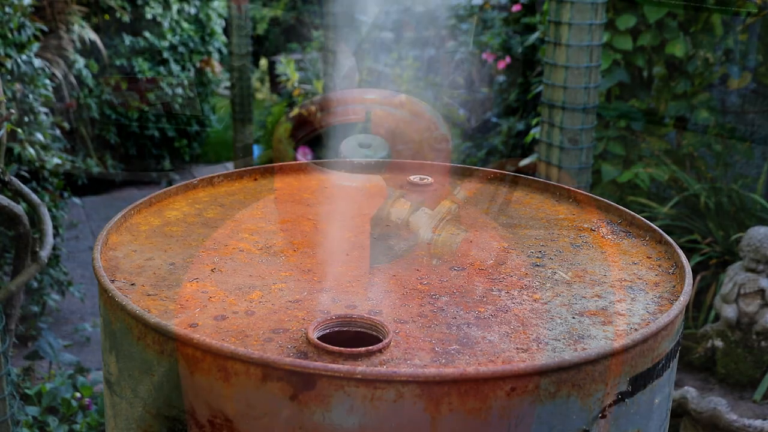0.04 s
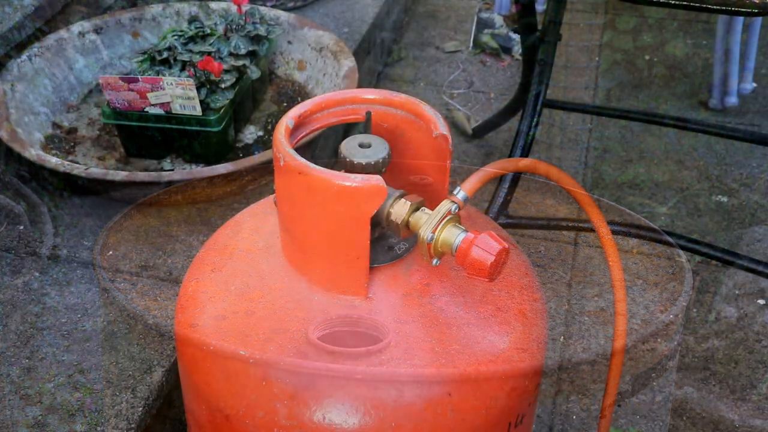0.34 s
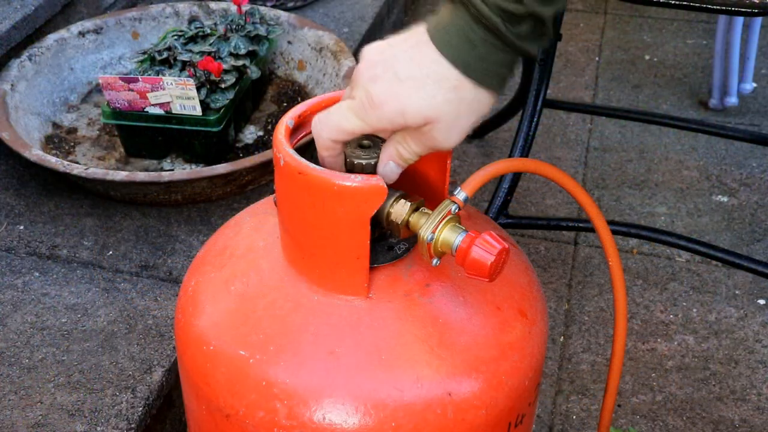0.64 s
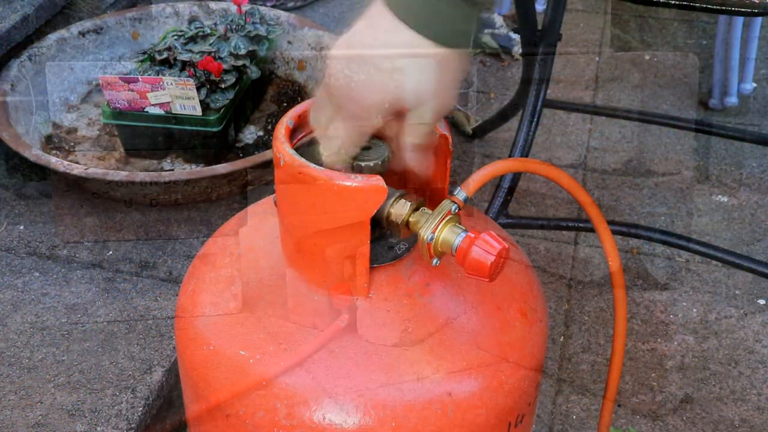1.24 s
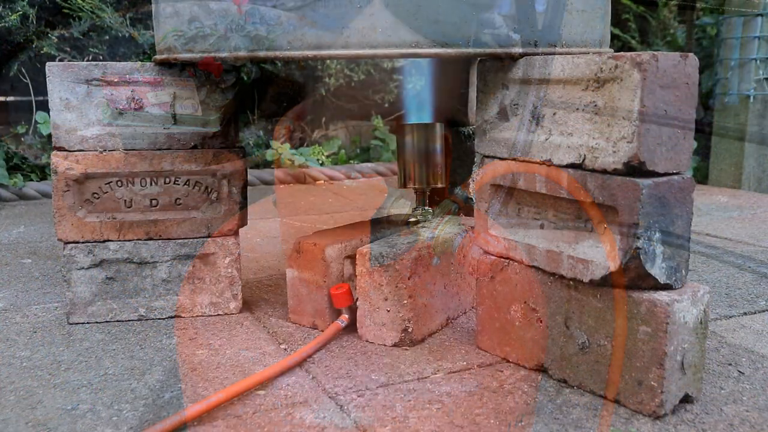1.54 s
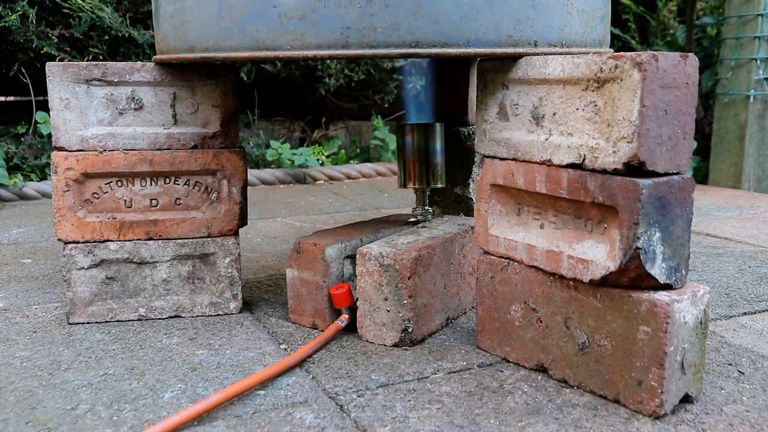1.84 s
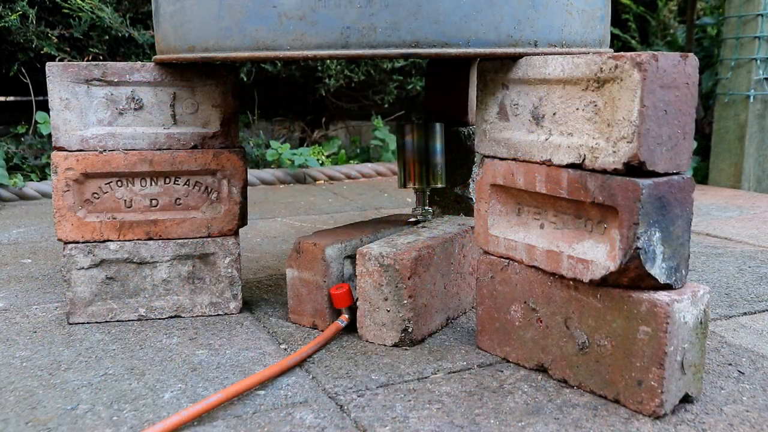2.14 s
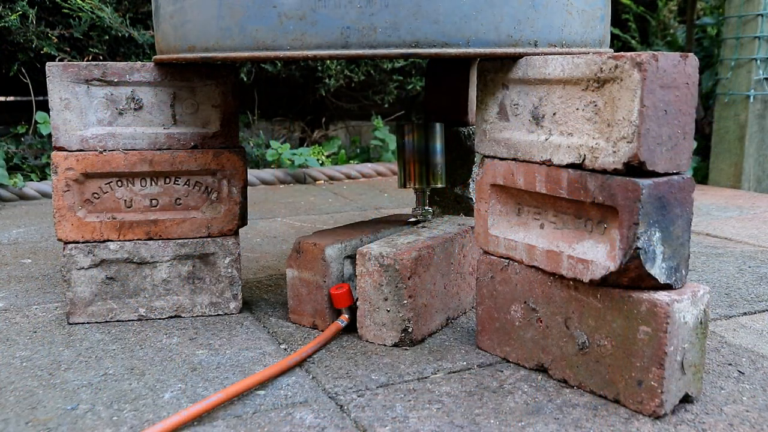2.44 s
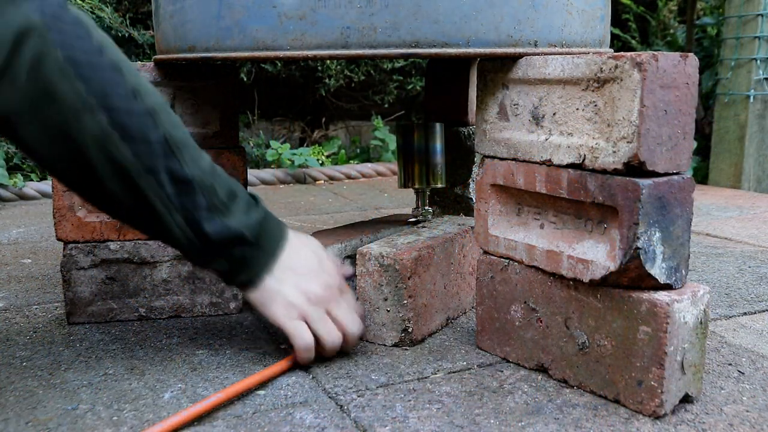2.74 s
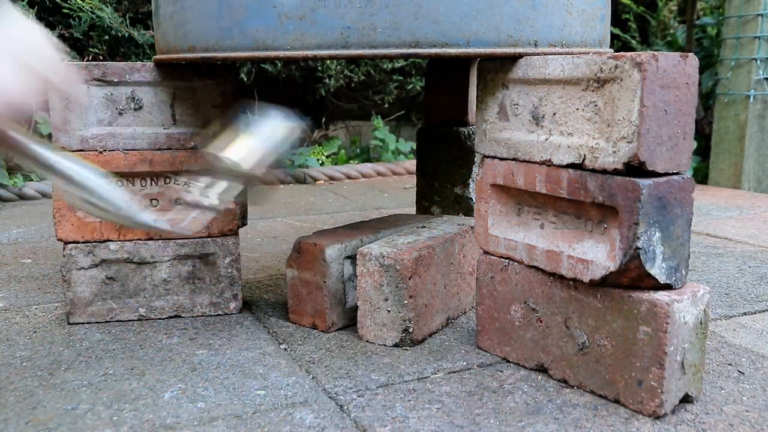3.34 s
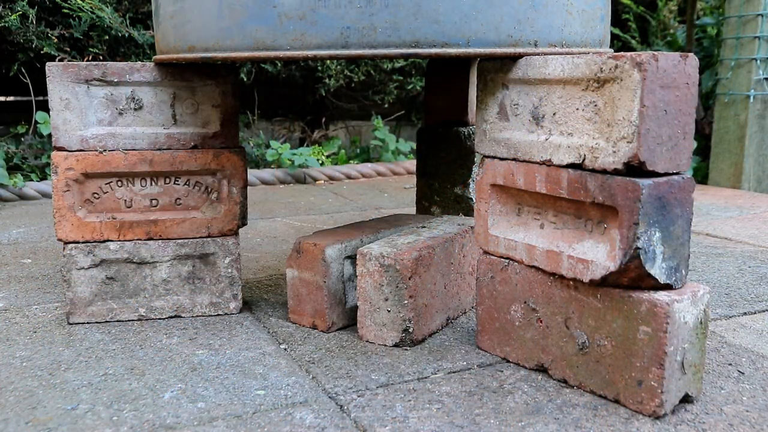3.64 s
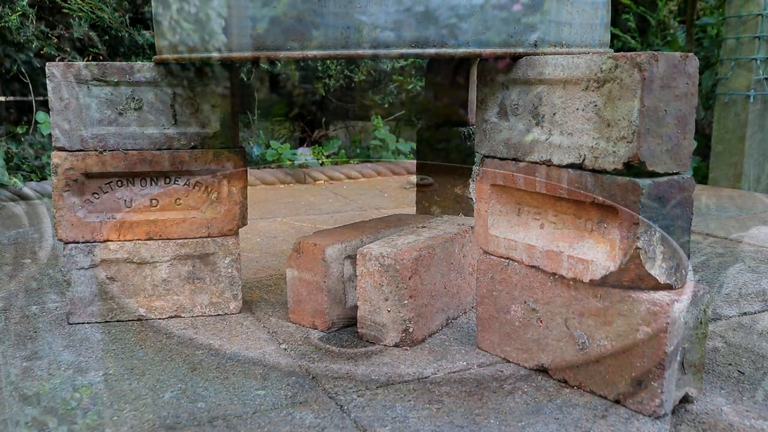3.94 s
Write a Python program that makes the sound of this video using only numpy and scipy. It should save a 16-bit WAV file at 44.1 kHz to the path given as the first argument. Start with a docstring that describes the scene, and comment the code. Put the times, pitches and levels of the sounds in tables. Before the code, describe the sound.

A gas burner roars steadily under a steel drum, dipping slightly around 1 second, then sounding closer and hissier from 1.5. At about 2 seconds it shuts off quickly, hiss first. Quiet garden air remains, with faint scuffs and hose rubbing from 2.3. At 3.2 the steel torch scrapes lightly off a brick and rings briefly. A distant bird calls very faintly near 2.8 and 3.4.

```python
"""A gas torch roars under a steel drum: turbulent flame and hissing jet, coloured by the drum's
resonances, heard at the vent, then by the gas bottle, then beside the flame. The valve is shut:
the hiss dies first, then the roar. In the quiet garden the hose is picked up, and the torch
scrapes off its brick and rings as it is carried away. A distant bird calls twice."""
import sys
import numpy as np
from scipy import signal
from scipy.fft import rfft, irfft, next_fast_len
from scipy.io import wavfile
from scipy.ndimage import map_coordinates

SR = 44100
rng = np.random.default_rng(int(sys.argv[2]) if len(sys.argv) > 2 else 0)


def store_pcm(level_fs):
    """Save levels as 16-bit WAV."""
    pcm = np.round(np.clip(level_fs, -1, 1) * 32767).astype(np.int16)
    wavfile.write(sys.argv[1], SR, np.atleast_2d(pcm).T)


N = 176400

TO_BOTTLE_S, TO_NEAR_S = (0.4, 0.875), (1.22, 1.706)  # listener's moves: start, end
ECHO_FAR_DB, ECHO_NEAR_DB = -2.5, -9

# flame envelope: t/s, level/dB
FLAME_ENVELOPE = [(0.0, -14), (0.284, -13.5), (0.794, -18), (0.806, -19.5), (1.3, -19), (1.332, -16.5),
                  (1.364, -19), (1.418, -16), (1.606, -16.5), (1.73, -14), (1.93, -15)]
# flame spectra at vent, bottle and flame: f/Hz, relative density/dB
ROAR_VENT = [(15, -54), (25, -30), (54, -27.5), (80, -7.5), (119, -14), (162, -2.5), (212, -4.5), (250, 1),
             (328, -11), (407, -8.5), (471, -6.5), (544, -6.5), (652, -2.5), (826, -8.5), (872, -11),
             (954, -17), (1030, -6.5), (1210, -12.5), (1400, -9.5), (1590, -21), (1740, -27.5), (1900, -29),
             (2470, -56.5), (4180, -120)]
ROAR_BOTTLE = [(15, -67), (25, -38), (60, -24), (84, -11.5), (130, -1), (187, -6.5), (220, -1.5), (245, -2),
               (316, 0), (415, -8.5), (525, -9.5), (641, -3), (701, -12), (796, -17.5), (888, -9.5),
               (972, -16), (1060, -9), (1250, -8), (1420, -9), (1530, -14.5), (1900, -25.5), (2470, -54.5),
               (4180, -120)]
ROAR_NEAR = [(15, -58), (25, -28.5), (81, -12.5), (130, -0.5), (201, -3.5), (232, 4), (259, -4),
             (316, -0.5), (352, -7), (393, -3), (506, -6), (618, -10), (689, -16), (872, -17.5), (1030, -8),
             (1280, -9), (1420, -10.5), (1560, -18), (1900, -30.5), (2470, -53.5), (4180, -120)]
def flame():
    """Turbulent combustion roars in the drum, heard from three places in turn."""
    vent = in_drum(ROAR_VENT, ECHO_FAR_DB, resonance=1.7)
    bottle = in_drum(ROAR_BOTTLE, ECHO_FAR_DB, resonance=0.77)
    near = in_drum(ROAR_NEAR, ECHO_NEAR_DB, resonance=0.69)
    far = move(vent, bottle, TO_BOTTLE_S)
    return unit(move(far, near, TO_NEAR_S)) * amp(curve(FLAME_ENVELOPE))


# jet envelope: t/s, level/dB
JET_ENVELOPE = [(0.0, -32), (0.368, -32), (0.844, -35), (1.144, -34.5), (1.62, -27.5), (1.92, -27)]
# jet spectra, far and near: f/Hz, relative density/dB
HISS_FAR = [(1000, -26.5), (1700, -7.5), (2050, -6.5), (2380, -3.5), (2920, -10.5), (3450, -3), (3960, -7),
            (4910, -4.5), (6310, -18.5), (7390, -20.5), (8260, -20), (10700, -24.5), (12600, -23.5),
            (14400, -26.5), (15700, -43)]
HISS_NEAR = [(1000, -32), (1700, 0), (3030, -5), (3640, -4.5), (4080, -9.5), (5000, -4), (5640, -12.5),
             (6860, -17.5), (7960, -18.5), (10300, -21), (12300, -20), (14000, -21.5), (15700, -29.5)]
def gas_jet(flutter_db=0.26):
    """Escaping gas hisses with a slight flutter."""
    far = in_drum(HISS_FAR, ECHO_FAR_DB, resonance=0.7)
    near = in_drum(HISS_NEAR, ECHO_NEAR_DB, resonance=0.4)
    flutter = amp(flutter_db * (wobble(96) + wobble(500)))
    return unit(move(far, near, TO_NEAR_S) * flutter) * amp(curve(JET_ENVELOPE))


# drum and torch tube peaks and dips: f/Hz, width/Hz, gain/dB at resonance=1
DRUM_RESONANCES = [(168, 20, 2), (226.7, 9.2, 2), (658, 5.3, 6.5), (710, 18, 1), (1030, 30, -0.5),
                   (1265, 30, 3.5), (1442, 13, 5), (2070, 18, 8), (2569, 30, -3.5), (3435, 25, -6.5),
                   (3355, 22, -0.5), (4480, 24, 3), (5150, 33, 2.5)]
def in_drum(spectrum, echo_db, resonance, echo_t60_s=0.076, drift_turns=0.21):
    """Turbulence coloured by resonances and by reflections that drift with the hot gas."""
    def colour_db(f):
        return sum(db / (1 + (2 * (f - hz) / width) ** 2) for hz, width, db in DRUM_RESONANCES)

    direct = filtered(noise(spectrum), lambda f: amp(resonance * colour_db(f)))
    treble = filtered(direct, lambda f: f ** 2 / (f ** 2 + 1200 ** 2))
    angle = 2 * np.pi * drift_turns * wobble(2.87)
    reflected = np.cos(angle) * echoes(treble, echo_t60_s) + np.sin(angle) * echoes(treble, echo_t60_s)
    return unit(direct + amp(echo_db) * reflected)


# decay after the valve shuts: f/Hz, start/s, initial fall/(dB/s)
PRESSURE_FALL = [(100, 1.952, 200), (400, 1.925, 198), (616, 1.924, 188), (776, 1.886, 181),
                 (1220, 1.948, 167), (1450, 1.933, 151), (2100, 1.917, 235), (5000, 1.918, 262),
                 (12000, 1.906, 332.5)]
def run_down(x, flame_out_s=2.018, out_db_per_s=560):
    """Falling pressure takes the treble first; then the flame goes out."""
    f, t, spectra = signal.stft(x, SR, nperseg=512)
    start_s = along([(hz, s) for hz, s, _ in PRESSURE_FALL], f)[:, None]
    fall_db_per_s = along([(hz, rate) for hz, _, rate in PRESSURE_FALL], f)[:, None]
    loss_db = fall_db_per_s * np.maximum(t - start_s, 0) + out_db_per_s * np.maximum(t - flame_out_s, 0)
    return signal.istft(spectra * amp(-loss_db), SR, nperseg=512)[1][:N]


def burner(tail_db=-25):
    """Flame and jet run until shut off; the roar reverberates in the drum."""
    roar = run_down(flame())
    hiss = run_down(gas_jet())
    return roar + hiss + amp(tail_db) * echoes(roar, t60_s=0.49)


# scrape envelope: t/s, level/dB
SCRAPE_ENVELOPE = [(3.13, -84), (3.18, -62), (3.205, -47.5), (3.226, -46.5), (3.24, -46), (3.268, -51),
                   (3.29, -67), (3.32, -110)]
# hard catches of steel on brick: t/s, level/dB
CATCHES = [(3.21, -48), (3.2263, -37), (3.246, -47.5), (3.269, -49.5)]
# grit spectrum: f/Hz, relative density/dB
GRIT_SPECTRUM = [(30, -35), (90, -16), (170, 4.5), (330, 7.5), (480, -3.5), (800, 5), (1500, -6.5),
                 (2400, -5), (3600, -14), (5000, -21), (9000, -26), (15000, -26)]
# steel modes: f/Hz, relative peak/dB, t60/s
TORCH_MODES = [(2160, -53, .08), (2200, -47, 0.14), (2345, -54, .2), (2620, -60, .1), (3150, -58, .35),
               (3327, -60, 0.32), (3500, -64, .25), (3750, -55, .1), (3880, -69, 0.45), (4520, -68, 0.67),
               (5000, -68, 0.29), (5440, -67, .4), (5570, -72, .35), (6460, -64, .13), (7250, -68, .13),
               (8226, -75, 0.34), (9162, -70, .15), (9700, -71.5, .15), (10130, -76, .4),
               (11100, -69.5, .08)]
# lowest note of the torch's cup, swelling as it swings past: t/s, level/dB
CUP_ENVELOPE = [(3.22, -73), (3.29, -52), (3.36, -49.5), (3.42, -45), (3.49, -54), (3.54, -50), (3.6, -59),
                (3.75, -85)]
def torch_scrape(grain_db=5, catch_t60_s=0.0184, ring_db=-1, cup_hz=1070):
    """Brick grit scrapes the steel torch and sets its modes ringing."""
    t = clock()
    friction = gesture(SCRAPE_ENVELOPE) * unit(amp(grain_db * wobble(900)))
    force = friction + sum(amp(db) * decay(s, catch_t60_s) for s, db in CATCHES)
    out = force * noise(GRIT_SPECTRUM)
    for hz, db, t60_s in TORCH_MODES:
        mode = np.exp(-np.log(1000) * t[:SR] / t60_s) * np.sin(2 * np.pi * hz * t[:SR])
        ring = signal.fftconvolve(force * rng.standard_normal(N), mode)[:N]
        out += 2 * amp(db + ring_db) * ring / np.abs(ring).max()
    cup = np.sqrt(2) * gesture(CUP_ENVELOPE) * np.sin(2 * np.pi * cup_hz * t)
    return out + cup


# scuffs and ticks on paving: t/s, level/dB, f/Hz, relative width, t60/s
PAVING_SCUFFS = [(2.294, -56, 1900, 0.53, 0.022), (2.424, -55, 171, 0.56, 0.1),
                 (2.531, -41.5, 850, 0.91, 0.039), (2.544, -41.5, 199, 2.7, 0.05),
                 (2.65, -63, 4000, 1.1, 0.018), (2.672, -44, 503, 1.5, 0.061),
                 (2.691, -49.5, 4130, 0.937, 0.019), (2.707, -61, 5000, .9, .008),
                 (2.724, -43.5, 2070, 0.38, 0.019), (3.682, -49, 1490, 0.93, 0.039),
                 (3.956, -51, 200, 1.3, 0.091)]
# hose and sleeve drags: centre t/s, half length/s, level/dB, f/Hz, relative width
HOSE_DRAGS = [(2.47, .06, -73, 1700, 1.5), (2.567, 0.045, -64, 1590, 0.98), (2.733, 0.0647, -66, 1980, 2),
              (3.05, 0.024, -74, 2480, 1.6), (3.574, .016, -59, 2900, 0.69), (3.691, 0.023, -52, 1600, 1),
              (3.77, 0.0092, -53, 3150, 0.91), (3.97, .06, -81, 8000, 0.9)]
def handling(grain_db=4):
    """Shoe, sleeve and hose rub in short scuffs and grainy drags."""
    out = np.zeros(N)
    for start_s, db, hz, width, t60_s in PAVING_SCUFFS:
        fade = decay(start_s, t60_s)
        scuff = unit(hump(rng.standard_normal(N) * fade, hz, width))
        out += amp(db) * scuff * np.sqrt(np.mean(fade ** 2))
    for centre_s, half_s, db, hz, width in HOSE_DRAGS:
        rub = hump(rng.standard_normal(N), hz, width)
        grain = amp(grain_db * wobble(600))
        swell = np.exp(-((clock() - centre_s) / half_s) ** 2)
        out += amp(db) * unit(rub * grain) * swell
    return out


# calls: t/s, length/s, first f/Hz, middle f/Hz, last f/Hz, level/dB
BIRD_CALLS = [(2.846, 0.095, 2830, 3200, 3110, -67), (3.375, 0.097, 2790, 2410, 1950, -62)]
def bird(rough_hz=109, echo_db=-6):
    """Two faint gliding calls, husky from pitch jitter."""
    out = np.zeros(N)
    for start_s, length_s, *glide_hz, db in BIRD_CALLS:
        progress = np.clip((clock() - start_s) / length_s, 0, 1)
        hz = np.interp(progress, [0, 0.5, 1], glide_hz) + rough_hz * wobble(480)
        swell = np.sqrt(np.abs(np.sin(np.pi * progress)))
        out += amp(db) * swell * np.sin(2 * np.pi * np.cumsum(hz) / SR)
    return out + amp(echo_db) * echoes(out, t60_s=0.18)


# background envelopes: t/s, relative level/dB
RUMBLE_ENVELOPE = [(2.15, -68.5), (2.356, -67), (2.484, -63), (2.624, -59.5), (3.268, -52), (3.54, -58.5),
                   (3.768, -56), (4.0, -55)]
AIR_ENVELOPE = [(2.15, -62), (2.49, -65.5), (2.684, -57.5), (3.174, -59.5), (3.396, -58), (3.612, -56.5),
                (4.0, -54.5)]
# background spectra: f/Hz, relative density/dB
RUMBLE_SPECTRUM = [(12, -49), (20, -24), (43, -6), (118, -5.5), (162, 1.5), (238, 0), (307, -8),
                   (439, -7.5), (600, -20), (780, -41), (1320, -120)]
AIR_SPECTRUM = [(290, -18.5), (500, -6), (578, -1.5), (658, -3.5), (943, 0), (1030, 0), (1120, 0.5),
                (1970, -12.5), (3550, -23), (4740, -36.5), (15700, -45.5)]
def garden(gain_db=1):
    """Distant rumble and outdoor air, both wavering slightly."""
    rumble = noise(RUMBLE_SPECTRUM) * amp(curve(RUMBLE_ENVELOPE) + 1.1 * wobble(10))
    air = noise(AIR_SPECTRUM) * amp(curve(AIR_ENVELOPE) + 0.5 * wobble(10))
    return amp(gain_db) * (rumble + air)


def amp(db):
    """Decibels to gain."""
    return 10 ** (np.asarray(db) / 20)


def unit(x):
    """Scale to rms 1."""
    return x / np.sqrt(np.mean(x ** 2) + 1e-20)


def clock():
    """Sample times in s."""
    return np.arange(N) / SR


def along(points, hz):
    """Interpolate (f/Hz, value) points on a log axis."""
    f, values = np.transpose(points)
    return np.interp(np.log(hz + 1), np.log(f + 1), values)


def curve(rows):
    """Interpolate (t/s, value) points per sample."""
    return np.interp(clock(), *np.transpose(rows))


def gesture(rows):
    """Gain from (t/s, level/dB) points, silent outside them."""
    return amp(np.interp(clock(), *np.transpose(rows), left=-np.inf, right=-np.inf))


def decay(start_s, t60_s):
    """Sudden onset, exponential fall."""
    return (clock() >= start_s) * np.exp(-np.log(1000) * np.abs(clock() - start_s) / t60_s)


def wobble(knots_per_s):
    """Smooth random curve."""
    return map_coordinates(rng.standard_normal(N // 4), [clock() * knots_per_s], mode="wrap")


def move(a, b, span_s):
    """Equal-power fade between listening places."""
    share = np.interp(clock(), span_s, [0, 1])
    return np.sqrt(1 - share) * a + np.sqrt(share) * b


def filtered(x, response):
    """Apply a frequency response."""
    size = next_fast_len(N + SR // 2)
    return irfft(rfft(x, size) * response(np.fft.rfftfreq(size, 1 / SR)), size)[..., :N]


def hump(x, hz, width):
    """Broad resonance; width is relative to hz."""
    return filtered(x, lambda f: 1 / (1 + 1j * (f / hz - hz / (f + 1)) / (2 * width)) ** 4)


def noise(spectrum):
    """Coloured noise of rms 1."""
    return unit(filtered(rng.standard_normal(N), lambda f: amp(along(spectrum, f))))


def echoes(x, t60_s):
    """Dense decaying reflections, a new pattern each call."""
    t = np.arange(SR // 2) / SR
    tail = rng.standard_normal(len(t)) * np.exp(-np.log(1000) * t / t60_s)
    return signal.fftconvolve(x, tail / np.linalg.norm(tail))[:N]


def scene():
    """All sources, centred."""
    mono = burner() + torch_scrape() + handling() + bird() + garden()
    return np.array([mono, mono])


def record(dry):
    """Brick-wall low-pass."""
    top_hz = 15800
    return filtered(dry, lambda hz: hz < top_hz)


dry = scene()
out = record(dry)
store_pcm(out)
```